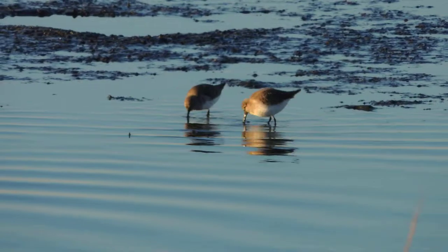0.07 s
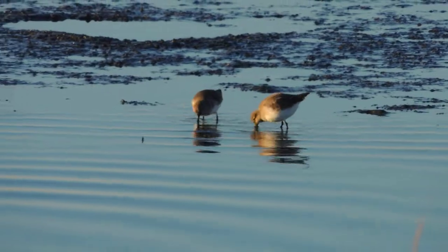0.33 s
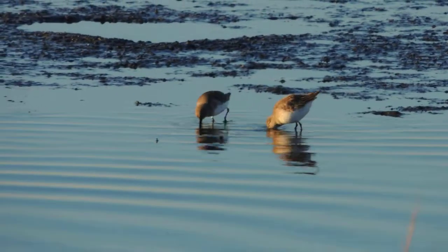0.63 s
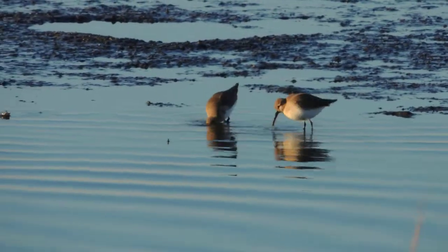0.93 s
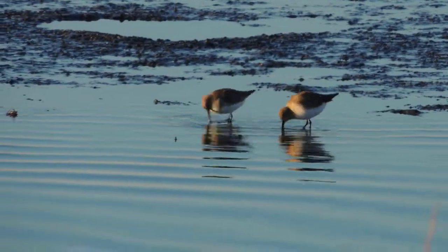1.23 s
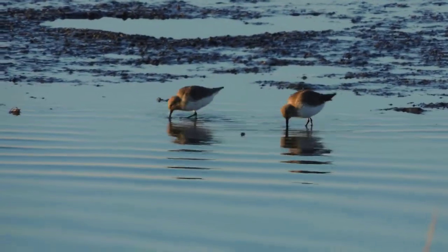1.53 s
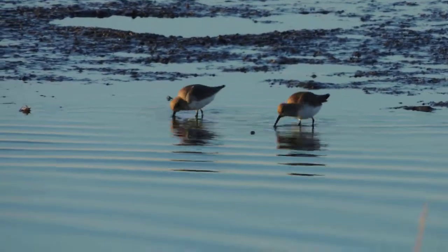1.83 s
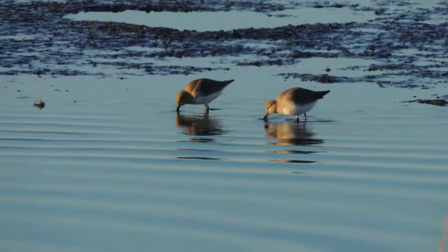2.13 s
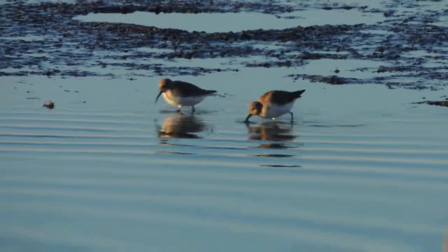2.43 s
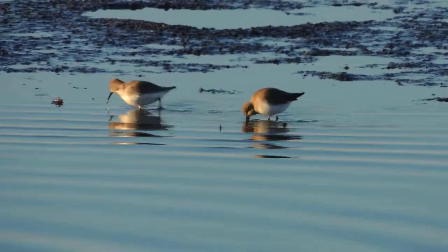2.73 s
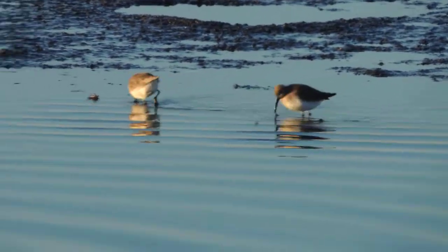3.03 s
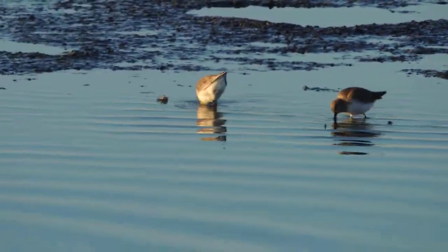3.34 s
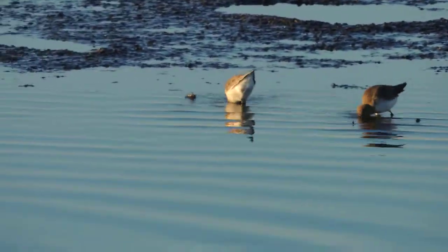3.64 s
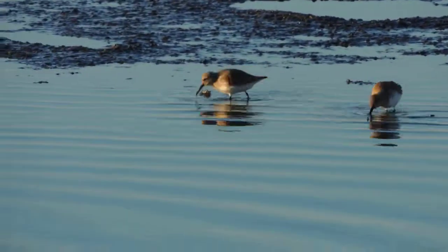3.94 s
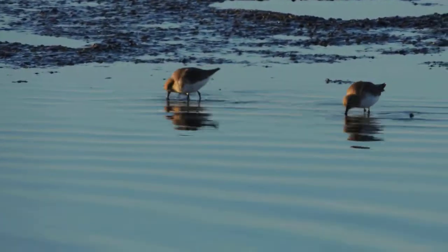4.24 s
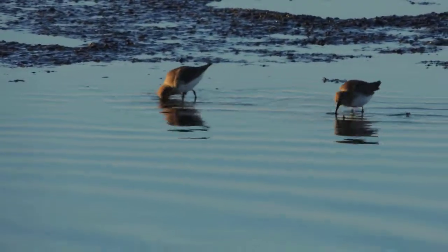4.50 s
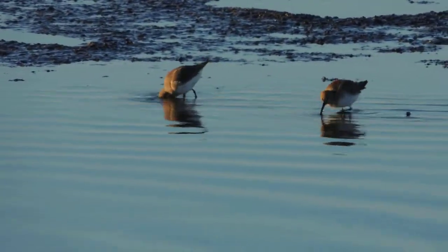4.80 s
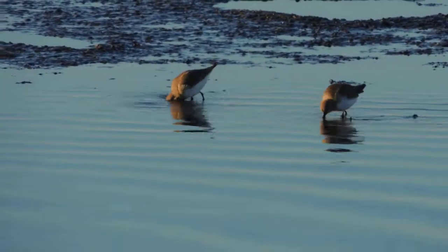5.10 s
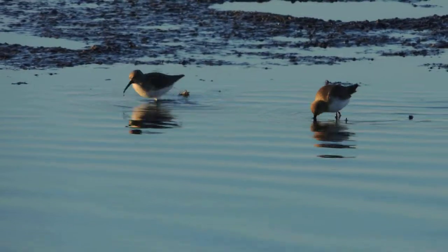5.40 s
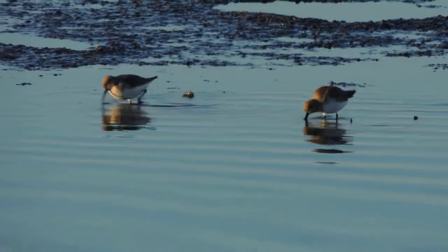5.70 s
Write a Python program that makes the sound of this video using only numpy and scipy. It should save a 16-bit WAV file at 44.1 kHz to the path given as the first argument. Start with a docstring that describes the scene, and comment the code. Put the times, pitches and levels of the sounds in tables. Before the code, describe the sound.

Wind blows across a stereo microphone on a quiet shore, thumping and fluttering mainly on the left side. Brief puffs with lulls between them build into a run of stronger gusts, and the hardest briefly overloads the microphone. Two light handling clicks come soon after. A low far-off throb and rumble and a steady hiss stay faintly behind, along with a few tiny, very faint peeps from wading birds.

```python
"""Beside a shallow mudflat, gusts of wind buffet a camera's stereo microphone, mostly on the left.
Eddies (small swirls of air) sweep past it, louder and brighter as the air speeds up. The sharpest
slap the microphone, and a limiter turns the sound down after the hardest hit.
Behind the wind are a low throb like a far engine, distant rumble, the camera's hiss and whine,
a few small handling clicks and faint peeps of shorebirds."""
import sys
import numpy as np
from scipy import signal
from scipy.fft import rfft, irfft
from scipy.io import wavfile
from scipy.ndimage import uniform_filter1d, map_coordinates

SR = 44100
rng = np.random.default_rng(int(sys.argv[2]) if len(sys.argv) > 2 else 0)


def waveform_to_disk(signal):
    """Save audio, clipped to [-1, 1], as 16-bit WAV at the path in sys.argv[1]."""
    frames = np.transpose(np.atleast_2d(signal))
    scaled = np.clip(frames, -1, 1) * 32767
    samples = np.round(scaled).astype(np.int16)
    wavfile.write(sys.argv[1], SR, samples)


N = 258426
T = np.arange(N) / SR

# puffs on the exposed left side: t/s, hold/s, level/dB, fineness/octaves (finer eddies sound higher)
LEFT_GUSTS = [(0.073, 0.084, -20, -0.39), (0.301, .04, -32, -.3), (1.086, 0.013, -27.5, -0.36),
              (1.215, 0.021, -23, -.2), (1.68, 0.0079, -30, -.2), (1.771, .02, -18, 0.16),
              (2.22, .015, -26, -.4), (2.343, 0.0096, -26.5, -.6), (2.901, .01, -27, -0.28),
              (3.019, 0.018, -24, -.3), (3.288, .008, -17, -0.41), (3.352, .085, -15, -.1),
              (3.495, .02, -18, .2), (3.55, .065, -26.5, -0.08), (3.856, .03, -15.5, .1),
              (3.915, .1, -16, 0), (4.046, .012, -11, 0.045), (4.085, 0.041, -17, -.15),
              (4.19, 0.11, -23.5, -.15), (4.412, .015, -25, -0.13), (4.56, 0.121, -20.5, -.35),
              (4.72, 0.072, -13, .15), (4.846, .024, -7, .1), (4.935, .045, -21, -0.16),
              (5.047, .06, -20, -.45), (5.231, 0.013, -22.5, -.5), (5.316, 0.05, -19, 0.06),
              (5.798, .035, -22.5, -0.27)]
# puffs that curl round to the sheltered right side: t/s, hold/s, level/dB
RIGHT_GUSTS = [(1.16, 0.097, -38), (2.34, 0.0097, -35), (3.025, .015, -22.5), (3.32, .12, -33),
               (4.725, 0.076, -27.5)]
# tone colour of the swirling air in a gust of about -15 dB: f/Hz, relative level/dB
EDDY_SPECTRUM = [(10, -24), (30, -14.5), (65, 0.5), (140, 1), (240, -4), (400, -12.5), (600, -21.5),
                 (1000, -34.5), (1500, -53.5), (2500, -59), (5000, -73)]
# the hardest single eddies on the left: t/s, peak level/dB, centre f/Hz
HARD_EDDIES = [(1.222, -6, 294), (1.257, -9, 198), (1.771, -12, 310), (1.792, -8.5, 408), (3.294, -3, 276),
               (3.339, -11.5, 330.2), (3.424, -9.5, 330), (3.861, -10.5, 222.9), (3.939, -9, 467.4),
               (4.058, -6, 607), (4.250, -10.5, 280), (4.591, -5, 166.1), (4.764, -9.5, 619.6),
               (4.842, -2.5, 229.7), (4.854, 4, 397), (4.860, -2.5, 359.9), (4.871, -4, 938.7),
               (4.895, -4, 420), (5.049, -3, 103)]
# tones that make up the throb: multiple of the lowest pitch, relative level/dB
THROB_HARMONICS = [(1, 1.5), (2, -4), (3, -33), (4, -35), (6, -16.5), (9, -18), (12, -18.5)]
# tone colour of the distant rumble: f/Hz, relative level/dB
RUMBLE_SPECTRUM = [(10, -2.5), (28, -0.5), (60, -5.5), (110, -7), (200, -11.5), (400, -17), (700, -22),
                   (1000, -24.5), (1500, -34), (2200, -44), (4000, -70)]
# tone colour of the microphone's hiss on each side: f/Hz, relative level/dB
LEFT_HISS_SPECTRUM = [(100, -23), (1000, 4.5), (2400, 1.5), (3000, 3), (4500, -0.5), (7000, -0.5),
                      (9500, -0.5), (11200, 2), (14000, -1.4)]
RIGHT_HISS_SPECTRUM = [(100, -7), (1000, 2.5), (2500, 5), (4000, 2), (5200, 1.5), (6000, 2.5), (7500, 0.7),
                       (9000, 1.7), (11200, 0.4), (14000, -2.5)]
# loudness of the hiss, before a small trim for each side: t/s, level/dB
HISS_LOUDNESS = [(0, -53.5), (1.9, -51.5), (3.0, -52.5), (5.25, -52), (5.38, -50), (5.86, -52)]
# tones of the camera's whine: f/Hz, relative level/dB
WHINE_TONES = [(4258, -82), (4458, -81), (8620, -75)]
# small knocks from handling the camera: t/s, relative level/dB, decay/s
HANDLING_CLICKS = [(1.006, -53.5, 0.026), (1.765, -56, .02), (3.400, -52, 0.0047), (5.184, -39, 0.0053),
                   (5.2803, -40.5, 0.0051)]
# tone colour of the camera body when it rings: f/Hz, relative level/dB
BODY_SPECTRUM = [(1500, -35), (2800, -18), (3400, -4.5), (4200, -8), (5600, 2.5), (6400, -5), (8200, -2.5),
                 (11000, -2.5), (14000, -8)]
# peeps of far shorebirds: t/s, f/Hz, peak level/dB, half length/s
BIRD_PEEPS = [(1.653, 9210, -56, 0.01), (3.083, 3633, -59, 0.017), (5.076, 4966, -58, 0.012)]


def undb(db):
    """Turn decibels into a number to multiply a sound by."""
    return 10 ** (np.asarray(db) / 20)


def noise(spectrum):
    """Noise with a spread of 1, coloured by rows of f/Hz, level/dB."""
    hz, db = np.transpose(spectrum)
    bin_hz = np.maximum(np.fft.rfftfreq(N, 1 / SR), 1)
    gains = undb(np.interp(np.log(bin_hz), np.log(hz), db))
    coloured = irfft(rfft(rng.standard_normal(N)) * gains, N)
    return coloured / coloured.std()


def wander(rate_hz):
    """A smooth random wobble with a spread of 1 that changes about rate_hz times a second."""
    keep_slow = np.exp(-(np.fft.rfftfreq(N, 1 / SR) / rate_hz) ** 2)
    wobble = irfft(rfft(rng.standard_normal(N)) * keep_slow, N)
    return wobble / wobble.std()


def airflow(gusts, breeze_db, swing_db=4.5):
    """Gusts rise over a breeze. Gives the level in dB and which is strongest (the breeze counts last)."""
    levels = []
    for arrival, hold, db, *_ in gusts:
        # seconds to build and to die by 20 dB: a longer puff comes and goes more slowly
        rise_s, fall_s = .03 + .15 * hold, .028 + .85 * hold
        early = np.maximum(arrival - T, 0) / rise_s
        late = np.maximum(T - arrival - hold, 0) / fall_s
        levels.append(db - 20 * (early + late))
    levels.append(breeze_db + swing_db * np.tanh(wander(6.98)))
    return np.max(levels, axis=0), np.argmax(levels, axis=0)


def buffet(wind_db, fineness, flutter_db, flutter_hz, db_per_octave, reference_db, lull_speed):
    """The wind carries a pattern of eddies past the microphone: faster air is louder and higher."""
    force_db = wind_db + flutter_db * np.tanh(wander(flutter_hz))
    octaves = fineness + (force_db - reference_db) / db_per_octave
    speed = np.hypot(lull_speed, 2 ** octaves)  # never slower than lull_speed
    pattern = noise(EDDY_SPECTRUM)
    # even out the eddies, so that the wind alone sets their force
    pattern /= np.sqrt(uniform_filter1d(pattern ** 2, size=900, mode="wrap"))
    position = np.cumsum(speed) % (N - 1)
    return undb(force_db) * map_coordinates(pattern, [position], order=3, mode="wrap")


def small_eddies(wind_db, fineness, count=110, db_per_octave=30, reference_db=-15, largest_db=-9):
    """Random eddies, stronger and sharper in faster air, as rows of t/s, peak level/dB, centre f/Hz."""
    at = ((np.arange(count) + rng.random(count)) * (N - 1) / count).astype(int)
    level_scatter, pitch_scatter = rng.standard_normal((count, 2)).T
    peak_db = np.minimum(wind_db[at] + 2.5 + 1.5 * level_scatter, largest_db)
    octaves = fineness[at] + (wind_db[at] - reference_db) / db_per_octave + .28 * pitch_scatter
    centre_hz = 313 * 2 ** octaves
    return list(zip(T[at], peak_db, centre_hz))


def slaps(eddies, taper=0.97):
    """The core of an eddy crosses the microphone: a sharp suck between two softer pushes."""
    pressure = np.zeros(N)
    for t, db, hz in eddies:
        near = slice(*np.searchsorted(T, [t - .02, t + .02]))
        distance = np.pi * hz * (T[near] - t)  # from the core, in core widths
        fade = (1 + distance ** 2 / (2 * taper)) ** -(2 * taper + 1.5)
        pressure[near] -= undb(db) * (1 - 2 * distance ** 2) * fade
    return pressure


def wind():
    """Each side has its own swirling air; single eddies slap only the exposed left."""
    left_db, strongest = airflow(LEFT_GUSTS, breeze_db=-43)
    right_db, _ = airflow(RIGHT_GUSTS, breeze_db=-48)
    breeze_fineness = -.1  # octaves
    fineness = np.array([gust[3] for gust in LEFT_GUSTS] + [breeze_fineness])[strongest]
    left = buffet(left_db, fineness, flutter_db=4.5, flutter_hz=44.44,
                  db_per_octave=17, reference_db=-15, lull_speed=.28)
    right = buffet(right_db, fineness=0, flutter_db=3, flutter_hz=39.6,
                   db_per_octave=17.5, reference_db=-9.5, lull_speed=.3)
    left += slaps(HARD_EDDIES + small_eddies(left_db, fineness))
    return np.array([left, right])


def throb(beat_hz=21.8):
    """A low, steady beat with a few overtones, like a far engine."""
    turns = np.cumsum(beat_hz * (1 + .0045 * wander(2.52))) / SR
    tone = np.zeros(N)
    for multiple, db in THROB_HARMONICS:
        gain = undb(db + .43 * wander(2.8))
        tone += gain * np.sin(2 * np.pi * (multiple * turns + rng.random()))
    return undb([[-35.5], [-32.5]]) * tone  # left, right


def distant_rumble(own_gain=0.54):
    """Far rumble reaches both sides nearly alike, a little stronger on the right."""
    shared = noise(RUMBLE_SPECTRUM)
    own = np.array([noise(RUMBLE_SPECTRUM), noise(RUMBLE_SPECTRUM)])
    flicker = undb(.35 * wander(6.4) + .34 * wander(45))
    return undb([[-42.5], [-39]]) * flicker * (shared + own_gain * own)


def microphone_hiss():
    """Each side of the microphone makes its own soft, nearly steady hiss."""
    level_db = np.interp(T, *np.transpose(HISS_LOUDNESS))
    hiss = np.array([noise(LEFT_HISS_SPECTRUM), noise(RIGHT_HISS_SPECTRUM)])
    return undb([[-.1], [.4]]) * undb(level_db) * hiss


def camera_whine():
    """The camera's electronics give off thin, high tones, mostly on the right."""
    whine = sum(undb(db + 1.1 * wander(2)) * np.sin(2 * np.pi * hz * T) for hz, db in WHINE_TONES)
    return undb([[-10], [3]]) * whine


def handling_clicks(attack_s=0.00095):
    """Small knocks ring the camera body and die away quickly."""
    envelope = np.zeros(N)
    for t, db, decay_s in HANDLING_CLICKS:
        age = np.maximum(T - t, 0)
        envelope += undb(db) * (1 - np.exp(-age / attack_s)) * np.exp(-age / decay_s)
    ring = np.array([noise(BODY_SPECTRUM), noise(BODY_SPECTRUM)])
    return undb(4.5) * envelope * ring


def shorebirds():
    """Birds far across the mud give short peeps, each a single tone that swells and fades."""
    peeps = np.zeros(N)
    for t, hz, db, half_s in BIRD_PEEPS:
        swell = np.exp(-((T - t) / half_s) ** 2)
        peeps += undb(db) * swell * np.sin(2 * np.pi * hz * T)
    return peeps


def limiter(sound, ceiling=1.0, release_db_per_s=7):
    """A peak over the ceiling turns both sides down in about a millisecond; the level creeps back."""
    over_db = 20 * np.log10(np.maximum(np.abs(sound).max(axis=0) / ceiling, 1))
    recovery_db = release_db_per_s * T
    cut_db = np.maximum.accumulate(over_db + recovery_db) - recovery_db
    lag = np.exp(-1000 / SR)
    smooth_cut_db = signal.lfilter([1 - lag], [1, -lag], cut_db)
    return sound * undb(-smooth_cut_db)


def scene():
    """Wind over the quiet shore, mixed with the camera's own sounds."""
    steady = wind() + throb() + distant_rumble() + microphone_hiss() + camera_whine()
    return steady + handling_clicks() + shorebirds()


def record(dry, overload=0.91, top_hz=14250):
    """The hardest gust outruns the limiter and overloads with a crack; the highest treble is cut."""
    flattened = np.clip(limiter(dry), -overload, overload)
    treble_cut = signal.ellip(12, .1, 80, top_hz, fs=SR, output="sos")
    return signal.sosfilt(treble_cut, flattened)


dry = scene()
out = record(dry)
waveform_to_disk(out)
```